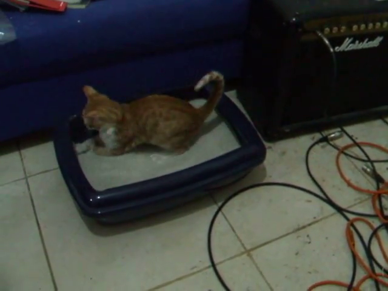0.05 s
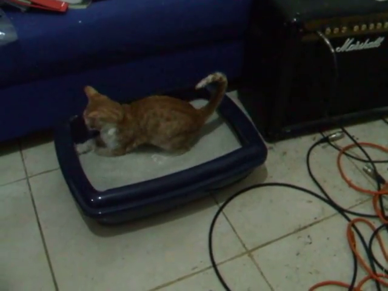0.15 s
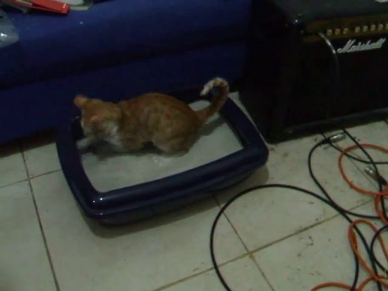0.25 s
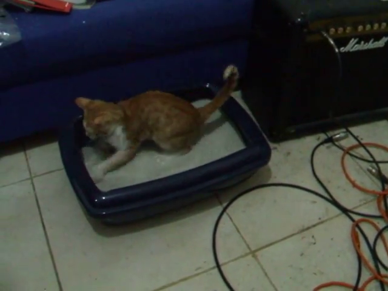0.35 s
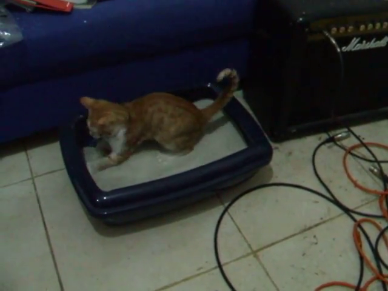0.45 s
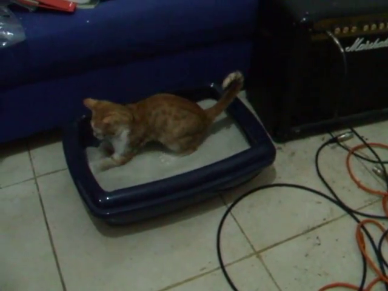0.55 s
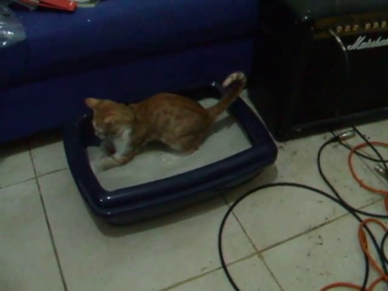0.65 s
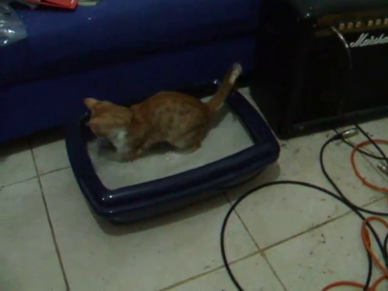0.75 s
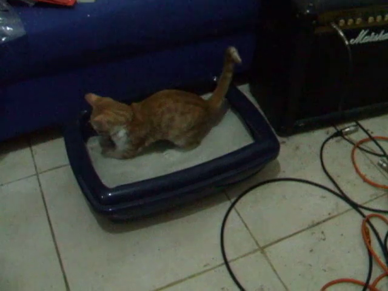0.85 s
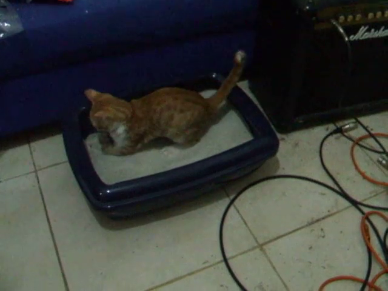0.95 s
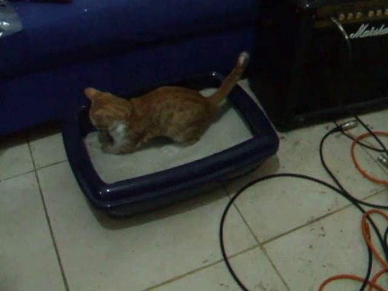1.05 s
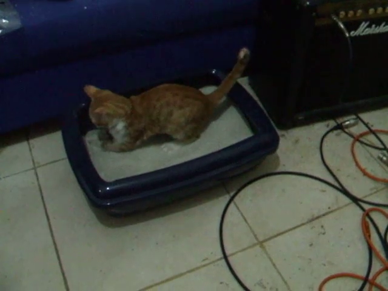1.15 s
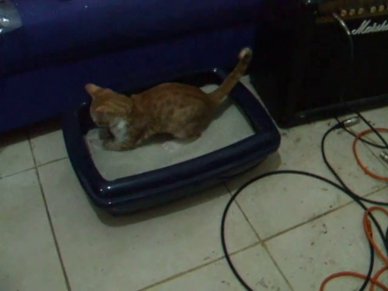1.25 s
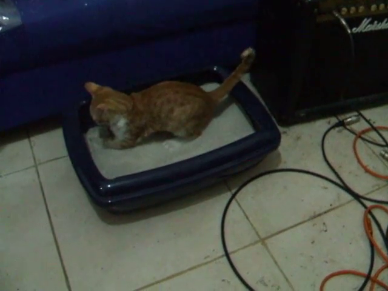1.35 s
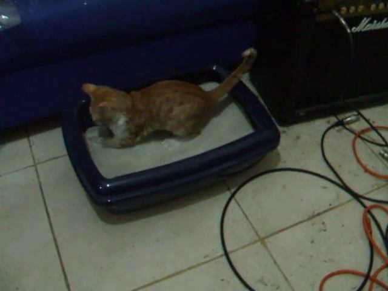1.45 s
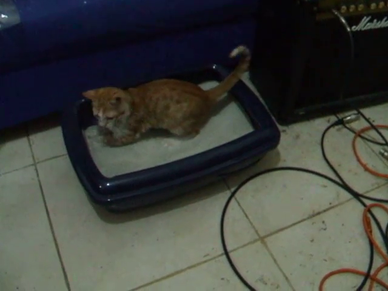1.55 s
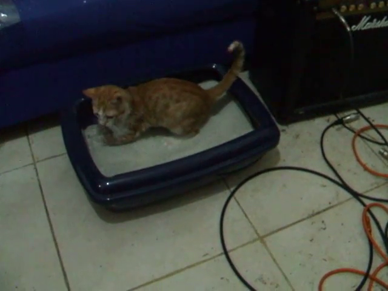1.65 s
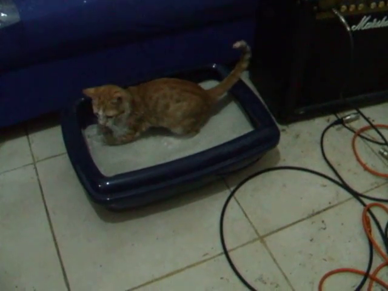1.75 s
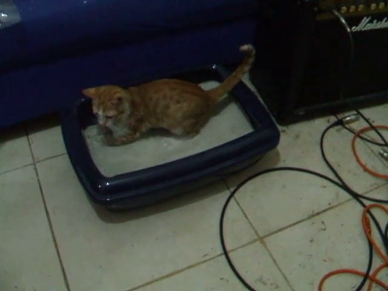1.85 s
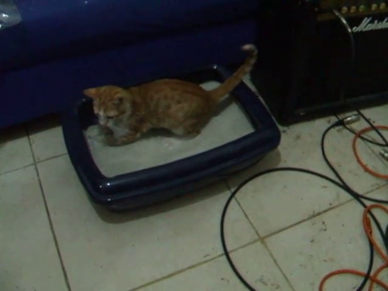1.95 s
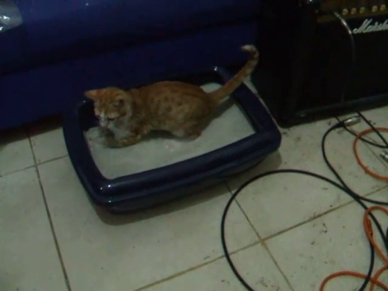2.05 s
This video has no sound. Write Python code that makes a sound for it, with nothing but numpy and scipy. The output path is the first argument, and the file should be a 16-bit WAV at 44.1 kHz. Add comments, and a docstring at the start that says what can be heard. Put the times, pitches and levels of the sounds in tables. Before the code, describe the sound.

A kitten digs in granular litter: two quick crunchy scoops, a short gap, then a louder stroke whose claws clack on the plastic wall, faint shuffles after; small hard room, hissy low-grade microphone.

```python
"""Kitten raking litter

A kitten rakes granular litter in a plastic box: two quick scoops, then a stroke that hits the wall.
Dense random grain hits crunch, hiss and rub; soft pushes ring the tray's low modes with a boom.
Claws click as a gritty noise crack plus wall modes; a faint shuffle follows, over air, hum and a thin whine.
A small hard room rings briefly, and a coarse 16 kHz converter lays its steady hiss over everything."""
import sys
import numpy as np
from scipy import signal
from scipy.fft import rfft, irfft
from scipy.io import wavfile

SR = 44100
rng = np.random.default_rng(int(sys.argv[2]) if len(sys.argv) > 2 else 0)


def transcribe(u):
    """Save the signal u as a 16-bit wav file named by the first command-line argument.

    u: samples, shape (n,) or (channels, n), limited to [-1, 1]; the rate is SR.
    q: integer samples, one column per channel.
    """
    v = np.clip(np.atleast_2d(u).T, -1, 1)
    q = np.round(v * 32767).astype(np.int16)
    wavfile.write(sys.argv[1], SR, q)


N = 92610  # samples, 2.1 s


def undb(db):
    """Decibels to amplitude gain."""
    return 10 ** (np.asarray(db) / 20)


def unit(x):
    """Scale to rms 1."""
    return x / np.sqrt(np.mean(x ** 2))


def since(start):
    """Seconds since a moment, zero before it."""
    return np.maximum(np.arange(N) / SR - start, 0)


def fade(age, t60):
    """Exponential decay that falls 60 dB in t60 seconds."""
    return np.exp(-np.log(1000) * age / max(t60, 1e-4))


def convolve(x, response):
    """Pass a sound through an impulse response."""
    return signal.fftconvolve(x, response)[:N]


def colour(x, points):
    """Equalise a sound along (f/Hz, level/dB) points on a log frequency axis; rms 1."""
    hz, db = np.array(points).T
    bins = np.maximum(np.fft.rfftfreq(N, 1 / SR), 1)
    gain = undb(np.interp(np.log(bins), np.log(hz), db))
    return unit(irfft(rfft(x) * gain, N))


def ring(modes):
    """Impulse response of a body: a sum of decaying modes."""
    t = since(0)
    return sum(undb(db) * np.cos(2 * np.pi * hz * t) * fade(t, t60) for hz, db, t60 in modes)


# room air spectrum: f/Hz, relative level/dB
AIR_COLOUR = [(20, -6), (70, -7), (140, -4), (210, 2.5), (400, -1.5), (650, -1), (1200, -6), (3000, -16),
              (8000, -16)]
# steady mains hum and faint drone: f/Hz, rms level/dB
TONES = [(49, -67), (119, -76), (194, -69.5), (235, -70.5), (694, -71)]
AIR_DB = -54  # rms
WHINE_HZ, WHINE_DB = 7853, -65  # centre pitch, rms level
WHINE_WOBBLE_HZ, WOBBLES_PER_S = 30, 29  # pitch swing either way, and its rate


def background():
    """Quiet coloured noise for air, sines for hum, and an electronic whine whose pitch shivers."""
    t = since(0)
    air = undb(AIR_DB) * colour(rng.standard_normal(N), AIR_COLOUR)
    tones = 0
    for hz, db in TONES:
        phase = rng.random()  # in cycles
        tones = tones + undb(db) * np.sqrt(2) * np.sin(2 * np.pi * (hz * t + phase))
    pitch = WHINE_HZ + WHINE_WOBBLE_HZ * np.sin(2 * np.pi * WOBBLES_PER_S * t)
    whine = undb(WHINE_DB) * unit(np.sin(2 * np.pi * np.cumsum(pitch) / SR))
    return air + tones + whine


GRAINS_PER_S, GRAIN_SPREAD_DB = 11000, 2.4  # mean hit rate; scale of the exponential size spread
CRUNCH_PER_S, CRUNCH_DB = 260, 1.2  # rate and scale of the random bunching


def grains():
    """Dense tiny collisions, mostly weak, bunched as the heap catches and gives way."""
    hits = (rng.random(N) < GRAINS_PER_S / SR) * rng.choice([-1, 1], N)
    size_db = GRAIN_SPREAD_DB * np.minimum(rng.exponential(size=N), 5)
    bunch = np.interp(since(0) * CRUNCH_PER_S, np.arange(N), rng.standard_normal(N))
    return hits * undb(size_db + CRUNCH_DB * bunch)


# paw strokes through the litter: start t/s, rise t/s, hold t/s, fade to -20 dB t/s,
# coarse grain level/dB, fine sand level/dB re coarse, tray rub level/dB re coarse
STROKES = [(0.194, 0.007, 0.03, 0.05, -41.5, -3, -21), (0.212, 0.032, 0.036, 0.075, -34.2, 0, -20),
           (0.3235, 0.001, 0.012, 0.095, -34.3, -2, -17), (0.388, 0.005, 0.018, 0.03, -37, 1, -15),
           (0.405, 0.011, 0.007, 0.09, -35.2, 1, -9), (0.470, 0.014, 0.024, 0.055, -43, 3.5, -21),
           (0.523, 0.02, 0.06, 0.09, -51, 1.5, -18), (0.691, 0.024, 0.036, 0.03, -43, -3.5, -14),
           (0.752, 0.016, 0.016, 0.076, -31, -2.8, -12), (0.930, 0.002, 0.003, 0.012, -54, 8, -18),
           (0.944, 0.003, 0.004, 0.025, -54, 4, -18), (1.105, 0.03, 0.03, 0.06, -59, -8, -20),
           (1.518, 0.03, 0.015, 0.03, -46.5, -2, -20), (1.580, 0.004, 0.007, 0.025, -46.5, -4, -24)]
# spectra of coarse grains, fine sand and pressed grains on the tray: f/Hz, relative level/dB
GRAIN_COLOUR = [(150, -24), (600, -16.5), (1200, -8.5), (1700, -6), (2200, -1.5), (2900, 0), (4000, -1.5),
                (5500, -8), (7600, -12)]
SAND_COLOUR = [(500, -30), (2000, -16), (3300, -5), (4300, -1), (5100, 1.5), (6100, -2), (7400, 0),
               (8000, -1)]
RUB_COLOUR = [(80, -16), (200, -7), (300, 0), (500, -1), (1000, -2), (1500, -6), (2500, -18), (7000, -35)]


def litter():
    """Strokes swell, hold and trickle out: coarse grains crunch, sand hisses, pressed grains rub the tray."""
    coarse, fine, pressed = 0, 0, 0  # overlapping strokes add as power
    for start, rise, hold, release, db, sand_db, rub_db in STROKES:
        swell = np.minimum(since(start) / max(rise, 1e-3), 1)
        trickle = 10 ** (-since(start + rise + hold) / release)
        effort = swell * trickle
        coarse = coarse + (effort * undb(db)) ** 2
        fine = fine + (effort * undb(db + sand_db)) ** 2
        pressed = pressed + (effort * undb(db + rub_db)) ** 2
    crunch = np.sqrt(coarse) * colour(grains(), GRAIN_COLOUR)
    hiss = np.sqrt(fine) * colour(grains(), SAND_COLOUR)
    rub = np.sqrt(pressed) * colour(grains(), RUB_COLOUR)
    return crunch + hiss + rub


# claws and hard granules click on the plastic: start t/s, relative level/dB
CLICKS = [(0.2900, -30), (0.3238, -30), (0.4180, -27), (0.4860, -37), (0.5045, -36), (0.7510, -19.8),
          (0.7543, -17.3), (0.7620, -31)]
# gritty crack spectrum: f/Hz, relative level/dB
CRACK_COLOUR = [(150, -14), (500, -1.5), (1000, -2), (1500, -6), (2200, 0), (5200, 0), (6100, -11),
                (8000, -13)]
# the stiff wall's modes: f/Hz, relative level/dB, t60 t/s
WALL = [(1770, -11, 0.02), (2165, 3.5, 0.026), (2503, -10, 0.05), (2944, -11, 0.08), (3385, -11, 0.03),
        (3840, -6.5, 0.025), (4260, -6.5, 0.025), (5180, -7, 0.035)]
CRACK_T60_S, CRACK_DB, WALL_DB = 0.018, -2.5, -7.5  # crack decay; mix gains


def claw_clicks():
    """Each tap gives a short gritty noise crack and rings the modes of the plastic wall."""
    taps, burst, t = np.zeros(N), 0, since(0)
    for start, db in CLICKS:
        taps[int(start * SR)] += undb(db)
        burst = burst + undb(db) * (t > start) * fade(since(start), CRACK_T60_S)
    crack = burst * colour(rng.standard_normal(N), CRACK_COLOUR)
    wall = convolve(taps, ring(WALL))
    return undb(CRACK_DB) * crack + undb(WALL_DB) * wall


# the paw bumps the tray: start t/s, relative level/dB, contact t/s
BUMPS = [(0.3268, -26.5, 0.0027), (0.412, -41, 0.001), (0.753, -20.5, 0.0008), (0.7620, -26.5, 0.0008),
         (0.777, -31.5, 0.001), (0.814, -37, 0.0014), (0.832, -40, 0.0014)]
# the tray's low modes: f/Hz, relative level/dB, t60 t/s
TRAY = [(88, -27, 0.22), (195, -15, 0.05), (240, -2.5, 0.065), (292, 1, 0.085), (338, -4.5, 0.075),
        (410, -11, 0.11), (640, -9, 0.04), (962, -9.5, 0.08)]


def tray_bumps():
    """Soft pushes of the paw ring the tray; a longer contact sounds duller."""
    force = 0
    for start, db, contact in BUMPS:
        progress = np.minimum(since(start) / max(contact, 1e-4), 1)
        push = np.sin(np.pi * progress) ** 2
        force = force + undb(db) * push / push.sum()  # equal impulse whatever the contact time
    return convolve(force, ring(TRAY)) / 2


ROOM_T60_S, ROOM_GAP_S = 0.27, 0.005  # decay, and delay before the tail


def room(x, wet_db):
    """Direct sound plus the room's short diffuse ring, a decaying noise tail."""
    age = since(ROOM_GAP_S)
    tail = rng.standard_normal(N) * (age > 0) * fade(age, ROOM_T60_S)
    return x + undb(wet_db) * convolve(x, tail / np.linalg.norm(tail))


GRAIN_ROOM_DB, CLICK_ROOM_DB, BUMP_ROOM_DB = -7, -8, -8  # room sends


def scene():
    """Litter, claws and tray in the room, over the dry background."""
    raking = room(litter(), GRAIN_ROOM_DB)
    clicking = room(claw_clicks(), CLICK_ROOM_DB)
    booming = room(tray_bumps(), BUMP_ROOM_DB)
    return (background() + raking + clicking + booming)[None]


STEP_DB = -45  # size of one converter step
CONVERTER_HZ, TOP_HZ = 16000, 9300  # sample rate, final lowpass corner


def record(dry):
    """A slow converter rounds the sound to coarse steps, which hiss; the top is cut."""
    slow = signal.resample(dry, N * CONVERTER_HZ // SR, axis=1)
    step = undb(STEP_DB)
    stepped = (np.floor(slow / step) + .5) * step
    # 16 kHz to 44.1 kHz is 441/160, so the smoothing filter runs at 441 times the converter rate
    smoothing = signal.firwin(441 * 36 + 1, 8200, window=("kaiser", 8), fs=441 * CONVERTER_HZ)
    full = signal.resample_poly(stepped, SR, CONVERTER_HZ, axis=1, window=smoothing)[:, :N]
    top_cut = signal.ellip(8, .1, 70, TOP_HZ, fs=SR, output="sos")
    return signal.sosfilt(top_cut, full)


dry = scene()
out = record(dry)
transcribe(out)
```